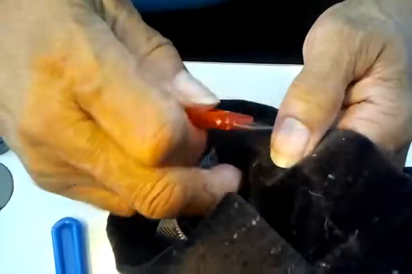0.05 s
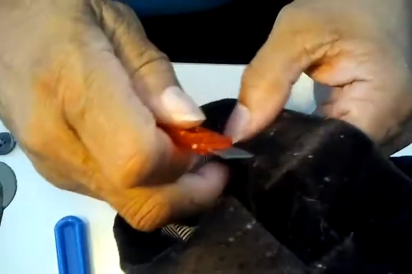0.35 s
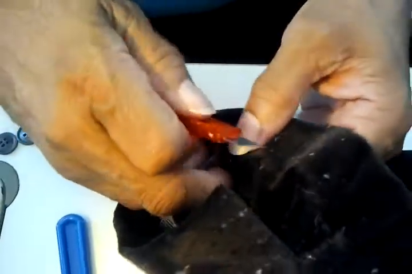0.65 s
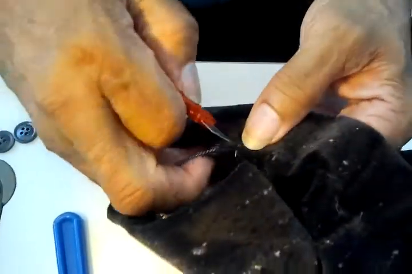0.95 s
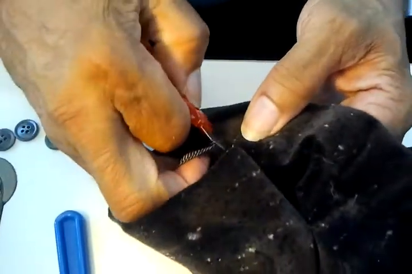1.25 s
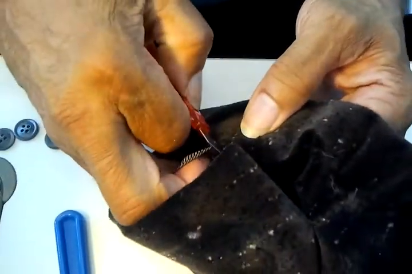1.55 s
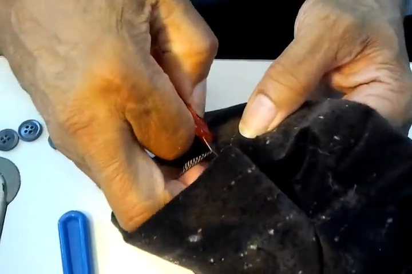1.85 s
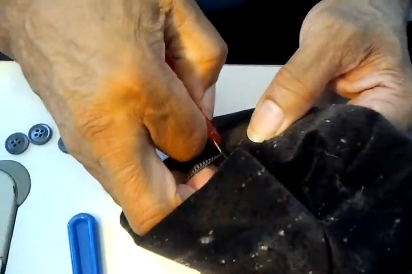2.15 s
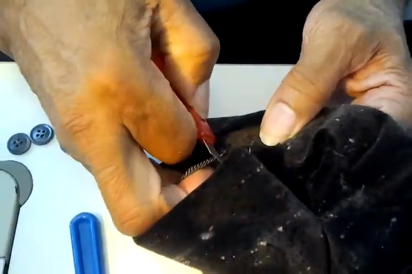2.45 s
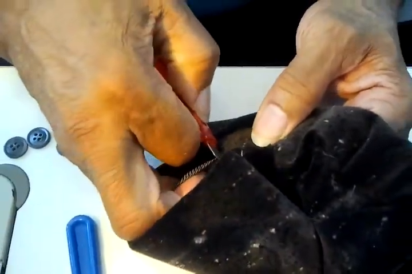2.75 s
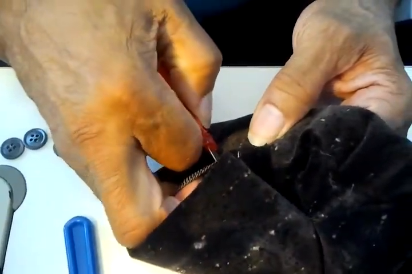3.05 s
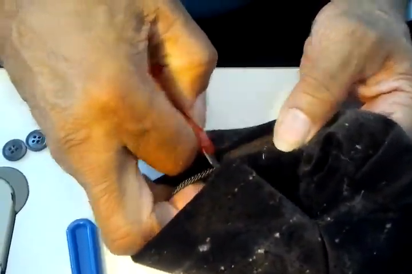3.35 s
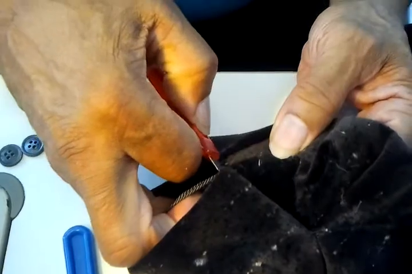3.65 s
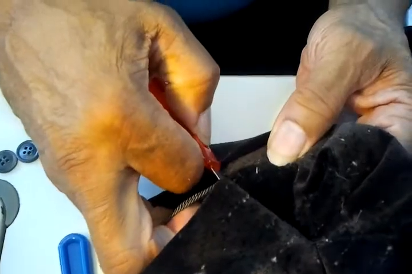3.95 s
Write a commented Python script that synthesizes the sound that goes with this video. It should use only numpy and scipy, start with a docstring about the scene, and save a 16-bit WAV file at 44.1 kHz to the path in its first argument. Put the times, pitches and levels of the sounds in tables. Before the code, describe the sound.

A small blade snaps stitches in heavy cloth. Fingers rustle faintly first, then come two pairs of sharp clicks with a light rasp of thread. The microphone is close, in a quiet room with steady fan hiss.

```python
"""A small blade unpicks a seam in heavy cloth, close to a narrow-band mono microphone in a quiet room.
Twice the edge saws into a stitch and the thread parts in a pair of snaps. Each is a sudden release of
tension: a bright tick from the flicked blade, and a dull pop as the taut cloth lets go.
Friction makes the thread rasp along the edge and the fingers rustle on the cloth; the hand nudges the
table once. Behind them are the hiss and narrow tones of a fan and a faint electrical whine."""
import sys
import numpy as np
from scipy import signal
from scipy.fft import rfft, irfft
from scipy.io import wavfile

SR = 44100
rng = np.random.default_rng(int(sys.argv[2]) if len(sys.argv) > 2 else 0)


def digitize_waveform(pressure):
    """Quantize a signal to 16-bit integers and store it at the path in sys.argv[1].

    Rows of a 2-D input are taken as channels; values are limited to [-1, 1].
    """
    field = np.atleast_2d(pressure).T
    bounded = np.clip(field, -1, 1)
    quanta = np.round(bounded * 32767).astype(np.int16)
    wavfile.write(sys.argv[1], SR, quanta)


N = 176400
TIME = np.arange(N) / SR

# Strands parting. Each row: start in seconds, tick level in dB, tick pitch in Hz,
# tick t60 (time to fall 60 dB) in seconds, level of the tearing fibres in dB.
STRAND_SNAPS = [(2.2873, -6.5, 5880, 0.0031, -26), (2.3669, -16, 5360, 0.0063, -28),
                (2.3680, -7.5, 6040, 0.0027, -31.5), (2.3692, -21, 5420, 0.0095, -36),
                (3.2868, -23, 6000, .007, -27), (3.2906, -31, 5400, .008, -39),
                (3.4335, -29, 5350, .008, -43), (3.4408, -22, 5470, 0.016, -35)]
# Taut cloth letting go. Each row: start in seconds, level in dB, pitch in Hz, t60 in seconds,
# level of the puff of air in dB.
CLOTH_POPS = [(2.2876, -25, 1780, 0.0079, -37), (2.2881, -31, 820, .006, -42),
              (2.3672, -19.5, 1040, .0065, -40), (3.2849, -24.5, 1240, 0.0052, -31),
              (3.4339, -14, 1150, 0.0043, -28)]
# Air and weave in a pop. Each row: frequency in Hz, relative level in dB.
PUFF_SPECTRUM = [(250, -25), (600, -1.5), (1500, -0.5), (2800, -1), (4500, -13), (8000, -22)]
# Thread dragging on the edge. Each row: peak time in seconds, level in dB, rise and t60 in seconds.
THREAD_DRAGS = [(2.235, -48, .025, 0.11), (2.2475, -43, .002, 0.033), (2.298, -47, .012, .13),
                (2.385, -45.5, 0.023, 0.36), (3.275, -50, 0.0044, 0.046), (3.315, -52.5, .03, 0.12),
                (3.425, -47, .003, .06), (3.443, -36.5, 0.024, 0.16), (3.553, -51, .002, 0.061),
                (3.738, -53, .008, .2)]
# Fibres against the resonant blade. Each row: frequency in Hz, relative level in dB.
BLADE_SPECTRUM = [(150, -51), (500, -23.5), (1500, -12), (3000, -16.5), (4600, -9.5), (5150, -3), (5480, 2),
                  (5900, -4.5), (7000, -4.5), (8000, -15.5), (9000, -15.5)]
# Fingers sliding on cloth. Each row: peak time in seconds, level in dB, rise and t60 in seconds.
FINGER_RUBS = [(.3, -57, .25, 0.72), (.825, -55, 0.009, 0.078), (.98, -58, .6, 1.1), (1.1, -63, .06, 0.13),
               (1.135, -54, .002, .025), (1.765, -54, .002, .025), (2.0, -59, .02, .15),
               (3.21, -59, .05, .2), (3.84, -59, .03, .2)]
# Rubbed cloth. Each row: frequency in Hz, relative level in dB.
RUB_SPECTRUM = [(1000, -18.5), (3000, -10.5), (4300, -0.5), (5600, 0.5), (7000, -5), (8000, -14),
                (9000, -19)]
# The hand nudging the table. Each row: peak time in seconds, level in dB, rise and t60 in seconds.
TABLE_NUDGES = [(3.622, -54.5, 0.014, 0.097)]
# The nudged table. Each row: frequency in Hz, relative level in dB.
TABLE_SPECTRUM = [(50, -32), (120, -12), (330, 1), (500, -11), (1200, -24)]
# Steady air noise of the room. Each row: frequency in Hz, relative spectral density in dB.
AIR_SPECTRUM = [(30, -48), (58, -30), (115, -23), (155, -15.3), (260, -10), (400, -8.3), (530, -8.8),
                (700, -1.5), (950, -.4), (1250, .2), (1480, -3.7), (2100, -7.5), (3200, -8.9), (5500, -9.3),
                (6400, -11.6), (7100, -16.3), (7900, -28.5), (8800, -26)]
# Narrow tones of a fan. Each row: frequency in Hz, half-width in Hz, level in dB.
FAN_TONES = [(359, 11, -78), (455, 10, -78), (757, 8, -68.5), (841.8, 10, -67.5), (1225, 33, -67)]
# Course of the electrical whine. Each row: time in seconds, level in dB.
WHINE_LEVELS = [(0, -73), (1.9, -74), (2.3, -68.5), (4, -71.5)]

TICK_ATTACK_S, TEAR_T60_S = 0.00034, 0.014
POP_ATTACK_S, PUFF_T60_S = 0.00057, 0.014
FIBRES_PER_S, FIBRE_SPREAD_DB = 5000, 2
CLOTH_LOW_HZ = 430
AIR_DB, AIR_WAVER_DB = -51.5, 0.44
WHINE_HZ, WHINE_WANDER_HZ = 6318, 3
MIC_TOP_HZ, CUTOFF_HZ = 7346, 8900


def strand_snaps():
    """Impulse excitation: each parting strand sets the blade ringing amid a crack of tearing fibres."""
    ticks = sum(from_db(db) * ring(s, hz, TICK_ATTACK_S, t60) for s, db, hz, t60, _ in STRAND_SNAPS)
    tearing = sum(from_db(db) * struck(s, TICK_ATTACK_S, TEAR_T60_S) for s, *_, db in STRAND_SNAPS)
    return ticks + tearing * coloured(rng.standard_normal(N), BLADE_SPECTRUM)


def cloth_pops():
    """Free vibration: the released cloth swings for a few cycles and displaces a puff of air."""
    swings = sum(from_db(db) * ring(s, hz, POP_ATTACK_S, t60) for s, db, hz, t60, _ in CLOTH_POPS)
    puffs = sum(from_db(db) * struck(s, POP_ATTACK_S, PUFF_T60_S) for s, *_, db in CLOTH_POPS)
    return swings + puffs * coloured(rng.standard_normal(N), PUFF_SPECTRUM)


def thread_rasps():
    """Forced vibration: fibres catch on the edge and drive the blade's resonance."""
    return strokes(THREAD_DRAGS) * coloured(fibre_slips(), BLADE_SPECTRUM)


def fibre_slips():
    """Stick-slip friction: single fibres let go at random, making a dense train of clicks."""
    sizes = from_db(FIBRE_SPREAD_DB * np.minimum(rng.exponential(1, N), 4))
    signs = rng.choice([-1, 1], N)
    slipping = rng.random(N) < FIBRES_PER_S / SR
    return sizes * signs * slipping


def seam_radiation(vibration):
    """Radiation efficiency: a patch of cloth much smaller than the wavelength gives off little bass."""
    highpass = signal.butter(3, CLOTH_LOW_HZ, "high", fs=SR, output="sos")
    return signal.sosfilt(highpass, vibration + 1e-18)


def finger_rubs():
    """Sliding friction: fibres slip under the fingers and merge into a soft, high rustle."""
    return strokes(FINGER_RUBS) * coloured(fibre_slips(), RUB_SPECTRUM)


def table_nudge():
    """Damped response: the table answers a soft push of the hand with a brief, low thud."""
    return strokes(TABLE_NUDGES) * coloured(rng.standard_normal(N), TABLE_SPECTRUM)


def fan_and_air():
    """Broadband and tonal noise: a slightly wavering hiss of air carries the faint tones of a fan."""
    air_gain = from_db(AIR_DB + AIR_WAVER_DB * narrow_noise(0, half_width_hz=6))
    hiss = air_gain * coloured(rng.standard_normal(N), AIR_SPECTRUM)
    tones = sum(from_db(db) * narrow_noise(hz, half_width) for hz, half_width, db in FAN_TONES)
    return hiss + tones


def electrical_whine():
    """Frequency modulation: a thin tone wanders slightly and at random about its pitch."""
    hz = WHINE_HZ + WHINE_WANDER_HZ * narrow_noise(0, half_width_hz=15)
    phase = 2 * np.pi * np.cumsum(hz) / SR
    level_db = np.interp(TIME, *np.transpose(WHINE_LEVELS))
    return from_db(level_db) * np.sqrt(2) * np.sin(phase)


def from_db(db):
    """Logarithmic level: every 20 dB is a factor of ten in amplitude."""
    return 10 ** (np.asarray(db) / 20)


def unit_rms(x):
    """Normalisation: the signal is scaled to a mean power of 1."""
    return x / np.sqrt(np.mean(x ** 2) + 1e-20)


def coloured(excitation, spectrum):
    """Source and filter: a spectrum of (Hz, dB) points shapes the excitation; rms 1."""
    hz, db = np.transpose(spectrum)
    bin_hz = np.maximum(np.fft.rfftfreq(N, 1 / SR), 1)
    gain = from_db(np.interp(np.log(bin_hz), np.log(hz), db))
    return unit_rms(irfft(rfft(excitation) * gain, N))


def narrow_noise(hz, half_width_hz):
    """Resonance: one narrow band of noise, which becomes a slow drift when centred on 0 Hz; rms 1."""
    detune = (np.fft.rfftfreq(N, 1 / SR) - hz) / half_width_hz
    return unit_rms(irfft(rfft(rng.standard_normal(N)) / (1 + detune ** 2), N))


def decay(start, t60):
    """Exponential damping: the amplitude is 1 until the start, then falls 60 dB every t60 seconds."""
    age = np.maximum(TIME - start, 0)
    return np.exp(-np.minimum(np.log(1000) * age / t60, 60))


def struck(start, attack, t60):
    """Transient envelope: it opens with the attack as its time constant and dies away."""
    age = np.maximum(TIME - start, 0)
    return (1 - np.exp(-age / attack)) * decay(start, t60)


def ring(start, hz, attack, t60):
    """Damped oscillator: a sinusoid under a transient envelope."""
    return struck(start, attack, t60) * np.sin(2 * np.pi * hz * (TIME - start))


def strokes(rows):
    """Growth and decay: a sum of envelopes, each rising linearly to its peak and then dying away."""
    envelope = np.zeros(N)
    for peak_time, db, rise, t60 in rows:
        growth = np.clip(1 + (TIME - peak_time) / rise, 0, 1)
        envelope += from_db(db) * growth * decay(peak_time, t60)
    return envelope


def scene():
    """Superposition: all sources add at one microphone, the same in both channels."""
    seam = seam_radiation(strand_snaps() + cloth_pops() + thread_rasps())
    pressure = seam + finger_rubs() + table_nudge() + fan_and_air() + electrical_whine()
    return np.tile(pressure, (2, 1))


def record(dry):
    """Band limiting: the microphone's treble rolls off, then the top is cut steeply."""
    roll_off = signal.butter(10, MIC_TOP_HZ, fs=SR, output="sos")
    steep_cut = signal.ellip(10, .1, 80, CUTOFF_HZ, fs=SR, output="sos")
    return signal.sosfilt(steep_cut, signal.sosfilt(roll_off, dry))


dry = scene()
out = record(dry)
digitize_waveform(out)
```